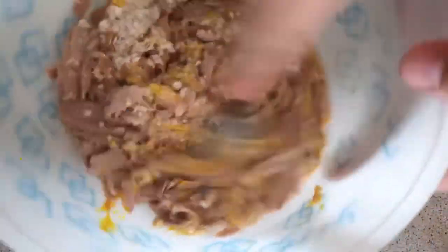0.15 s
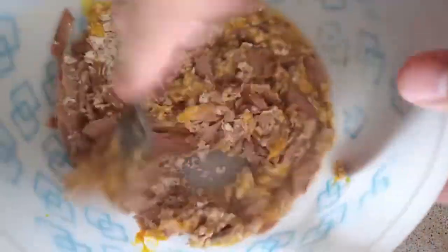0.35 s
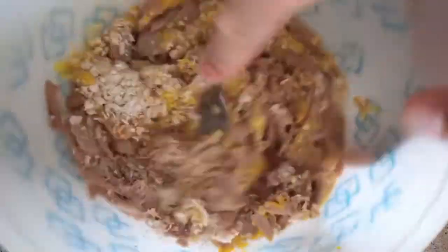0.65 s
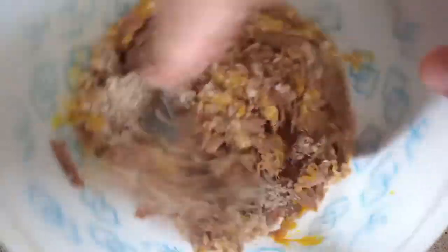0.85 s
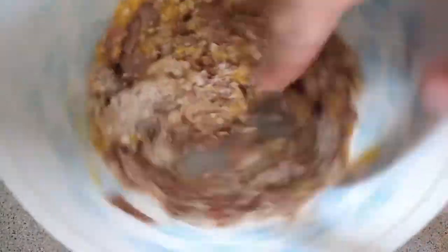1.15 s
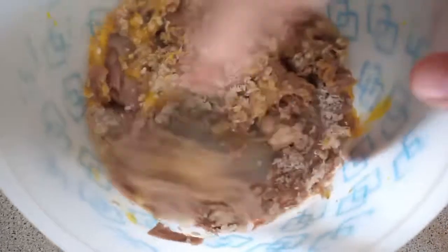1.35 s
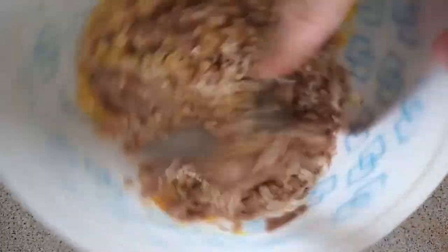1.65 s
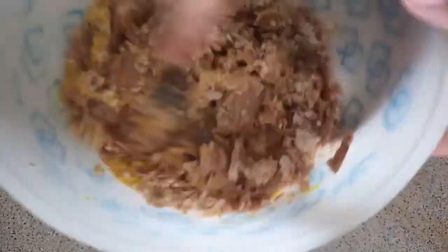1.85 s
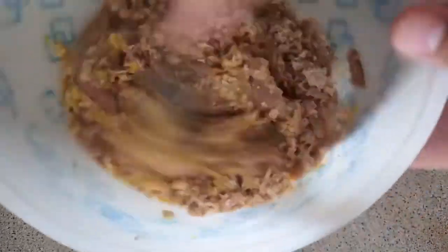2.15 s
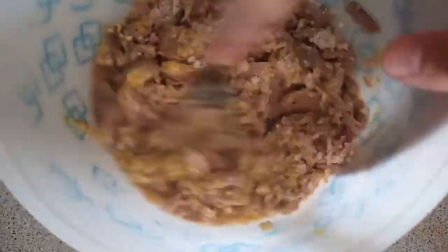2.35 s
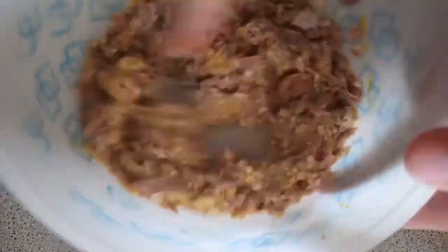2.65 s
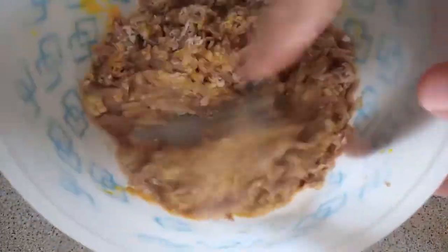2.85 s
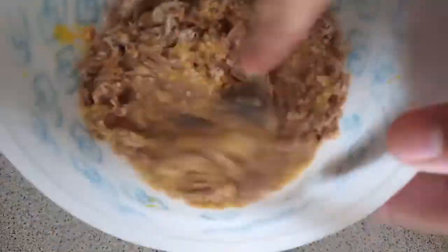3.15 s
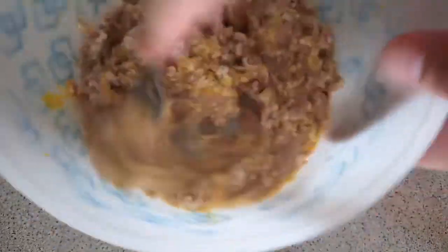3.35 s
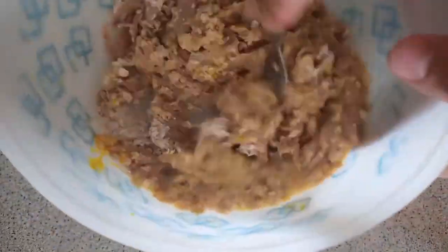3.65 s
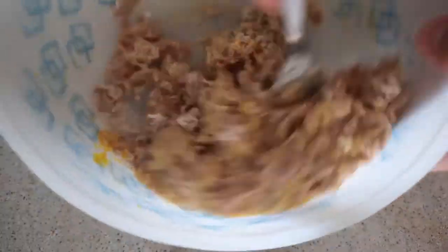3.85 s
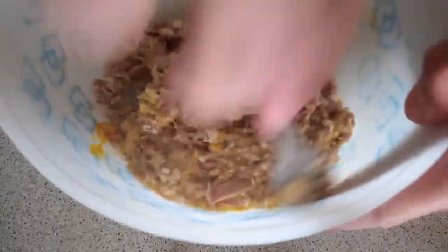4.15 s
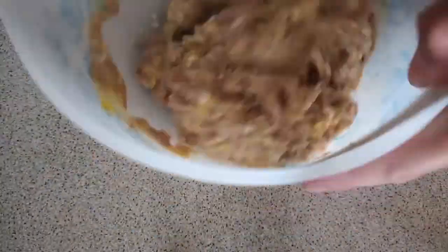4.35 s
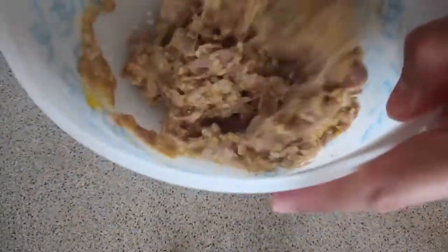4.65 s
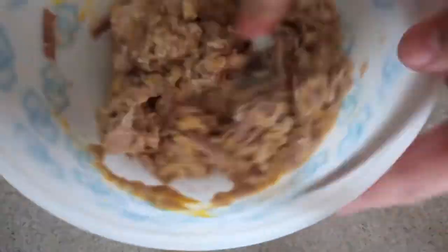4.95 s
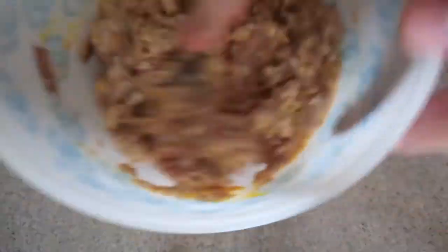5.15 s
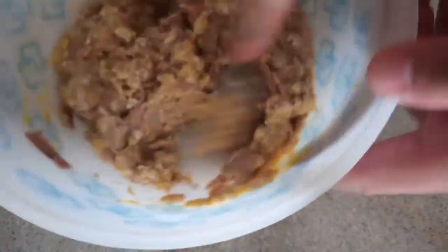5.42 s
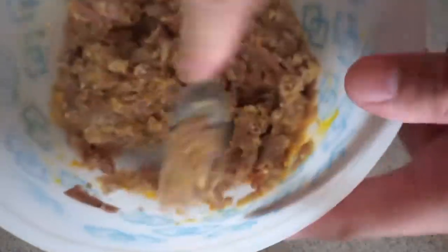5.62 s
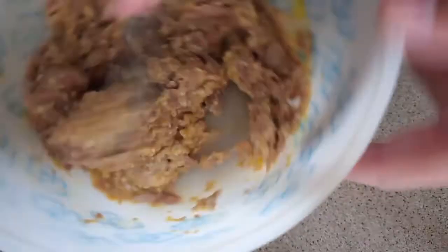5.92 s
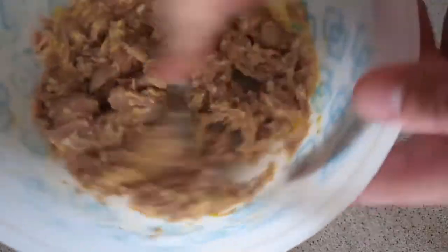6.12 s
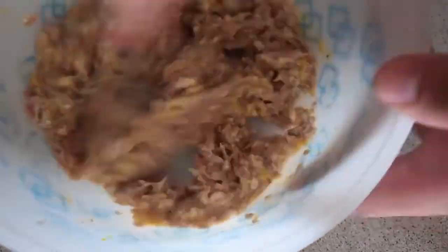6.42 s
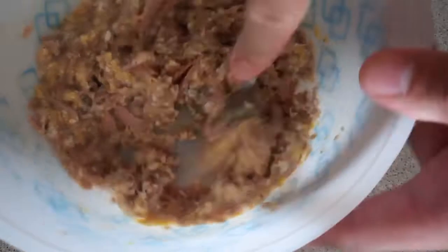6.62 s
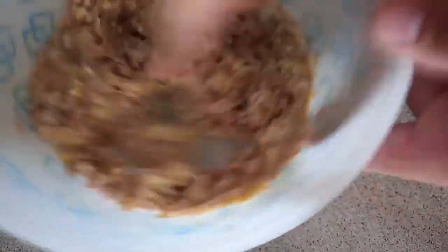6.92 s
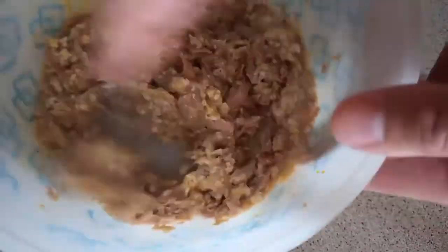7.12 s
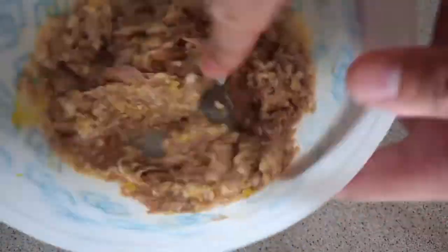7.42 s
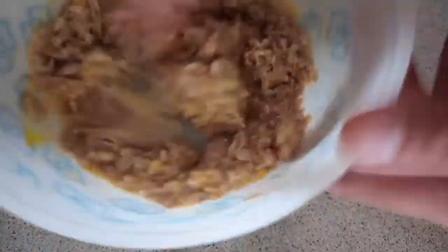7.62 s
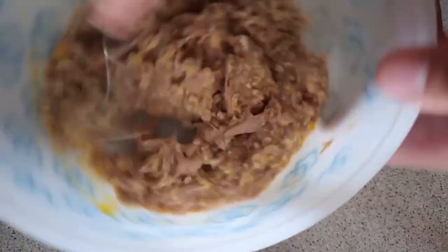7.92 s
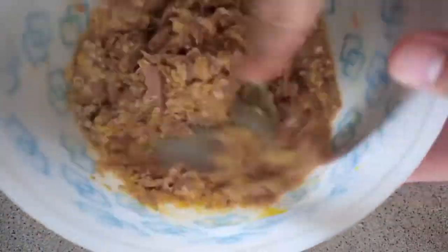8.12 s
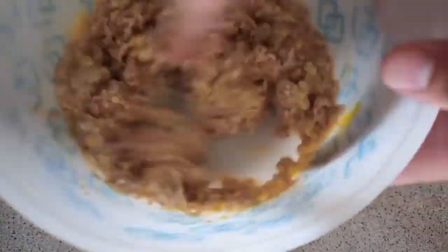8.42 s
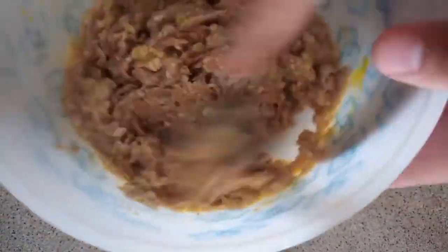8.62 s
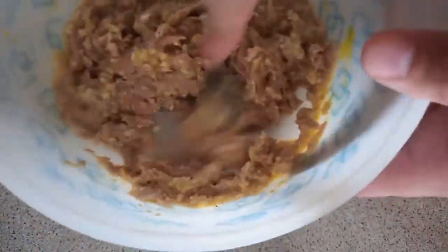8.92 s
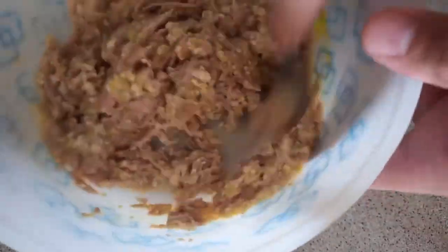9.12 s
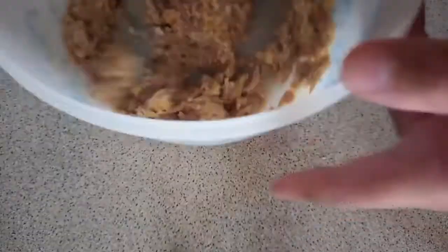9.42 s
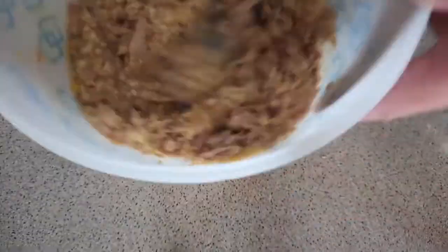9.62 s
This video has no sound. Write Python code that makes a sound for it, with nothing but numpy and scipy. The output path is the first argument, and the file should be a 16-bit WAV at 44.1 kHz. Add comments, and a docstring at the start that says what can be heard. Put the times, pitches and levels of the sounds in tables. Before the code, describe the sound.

Fast, wet fork strokes squish and crackle through thick mash, while tines clack and scrape against the bowl and low thumps punctuate the stirring.

```python
"""A metal fork mashes and stirs a wet mixture in a hand-held bowl, close by in a kitchen.
It beats to and fro in runs of about twelve strokes a second. Each stroke is shaped noise: it peels free
with a crackle, squishes, ticks wetly and, the harder it is, grazes the bowl. Now and then the tines skid
or clack as bursts of tiny slips, and the pushed bowl thumps as short decaying tones.
Air pockets ring with gliding tones, the mash rustles softly, and the walls add a faint echo."""
import sys
import numpy as np
from scipy import signal
from scipy.fft import rfft, irfft, next_fast_len
from scipy.io import wavfile
from scipy.ndimage import uniform_filter1d, map_coordinates

SR = 44100
rng = np.random.default_rng(int(sys.argv[2]) if len(sys.argv) > 2 else 0)


def wrap_up_sound(samples):
    """Save the sound to the file named by the first command line argument, as 16-bit audio."""
    columns = np.atleast_2d(samples).T
    # keep every value between -1 and 1, then stretch to whole-number steps
    tamed = np.clip(columns, -1, 1)
    steps = np.round(tamed * 32767).astype(np.int16)
    wavfile.write(sys.argv[1], SR, steps)


N = 430857
TOP_HZ = 8200  # nearly nothing sounds above this
SIZE = 16384  # samples in one short sound
AGE = np.arange(SIZE) / SR  # time since a short sound began [s]
HZ = np.fft.rfftfreq(SIZE, 1 / SR)

# All levels in the tables are relative: the layers scale them further.
# how long the echo of the walls takes to fade by 60 dB: (frequency [Hz], fade time [s])
ECHO_FADE = [(120, 0.26), (2000, 0.17), (8000, 0.31)]
# colour of the soft rustle of the mash: (frequency [Hz], level [dB])
RUSTLE_COLOUR = [(25, -8.5), (120, 8), (250, -18), (600, -16), (1300, -14.5), (6000, -22.5), (8000, -43.5)]
# resonances of the air inside the bowl: (frequency [Hz], width [Hz], level [dB])
BOWL_AIR = [(582, 96, -2), (1247, 55, 1.5)]
# air pockets open behind the fork: (centre [s], length [s], start pitch [Hz], end pitch [Hz], level [dB])
AIR_POCKETS = [(3.23, .17, 1490, 1107, -61.5), (3.962, .048, 1300, 890, -73.5),
               (4.097, 0.051, 700, 683, -71), (4.242, 0.062, 1560, 1226, -43.5),
               (4.465, 0.051, 1660, 1680, -69), (5.823, 0.0122, 2150, 2160, -42),
               (7.839, 0.009, 1950, 1890, -38), (8.648, 0.098, 1387, 1124, -64)]
# how freely the bowl rocks in the hand: (time [s], level [dB])
BOWL_ROCKING = [(0, -20), (.55, -3), (2.4, -3.5), (3.2, -6), (4.7, 5), (7.5, -2.5), (9.7, -0.5)]
# the bowl is shoved or knocked hard: (time [s], pitch [Hz], level [dB])
HARD_KNOCKS = [(.528, 120, -44), (.762, 357, -39), (.762, 193, -37), (1.11, 127, -39), (1.671, 129, -28.5),
               (2.203, 616, -31.5), (2.238, 127, -37.5), (2.408, 141, -40.5), (2.712, 112, -39.5),
               (3.596, 365, -35.5), (3.712, 360, -36.5), (3.714, 167, -37.5), (3.993, 470, -35),
               (4.884, 134, -34), (4.908, 191, -32), (5.34, 138, -26.5), (5.343, 592, -27),
               (5.386, 137, -28), (5.887, 135, -30.5), (6.425, 125, -40.5), (6.5, 124, -32.5),
               (6.778, 132, -34), (7.045, 135, -32), (7.687, 111, -42), (8.086, 134, -40),
               (8.966, 384, -31), (8.968, 163, -37.5), (9.101, 144, -35.5), (9.298, 128, -35.5),
               (9.365, 180, -29.5), (9.43, 161, -35), (9.604, 138, -18.5), (9.605, 577, -20)]
# the fork strikes the bowl: (time [s], time to fade by 60 dB [s], tine level [dB], bowl wall level [dB])
FORK_BLOWS = [(.761, 0.078, -37.5, -34.5), (1.593, 0.094, -44, -38), (2.181, 0.051, -41, -62),
              (2.236, .052, -52, -43), (2.582, 0.073, -32.5, -44.5), (2.867, .034, -31, -30.5),
              (2.879, 0.031, -49, -35.5), (3.029, 0.029, -40.5, -52), (3.108, 0.17, -47, -43.5),
              (3.597, 0.18, -50, -48), (3.992, 0.13, -54.5, -43), (4.523, 0.038, -72, -50.5),
              (4.881, 0.053, -44, -36.5), (4.907, 0.039, -45, -42.5), (5.304, 0.15, -48.5, -54.5),
              (5.341, 0.02, -35.5, -33.5), (5.816, 0.16, -59, -71), (6.417, 0.1, -56, -48),
              (6.499, 0.011, -38, -45), (7.835, .13, -46, -42.5), (8.73, 0.21, -51, -45),
              (8.832, 0.058, -36, -51), (8.965, 0.035, -61, -40.5), (9.365, 0.25, -50.5, -43.5),
              (9.601, 0.013, -34, -29)]
# hard skids of the tines over the bowl: (centre [s], length [s], tine level [dB], bowl wall level [dB])
HARD_SKIDS = [(0.522, 0.011, -58, -47), (1.313, 0.02, -48, -56), (1.362, 0.0079, -44, -52),
              (1.391, 0.016, -41, -51), (1.638, 0.013, -43.5, -60), (1.791, 0.019, -42, -52),
              (1.874, 0.019, -47.5, -59), (2.03, 0.026, -45, -51), (2.109, 0.019, -37.5, -57),
              (2.196, 0.021, -41.5, -47.5), (2.435, 0.032, -43, -49), (2.911, .021, -46, -47.5),
              (3.002, 0.018, -49, -51.5), (3.072, 0.017, -45, -51), (3.391, 0.02, -44.5, -54),
              (3.552, 0.019, -45, -54), (3.723, 0.014, -40.5, -45), (3.77, 0.073, -49, -42),
              (4.183, 0.029, -69, -46), (4.25, .075, -54, -44), (4.296, 0.038, -44, -41),
              (4.59, .013, -52.5, -51.5), (5.064, .017, -50, -47), (6.053, 0.021, -52.5, -49),
              (6.214, 0.024, -52, -49), (6.528, 0.0097, -46, -53), (6.849, 0.023, -45.5, -53),
              (8.763, 0.016, -45, -52), (8.992, 0.025, -43.5, -43), (9.107, .03, -44.5, -46.5),
              (9.216, .027, -45.5, -50), (9.715, 0.021, -50, -58.5)]
# colour of the fork's tines: (frequency [Hz], level [dB])
TINE_COLOUR = [(150, -17.5), (350, -16), (1000, -18.5), (1800, -13.5), (2050, -0.5), (2400, 3.5),
               (2650, -3), (2900, -1.5), (3400, -9.5), (4000, -11.5), (5500, -19.5), (7000, -21.5),
               (8000, -42.5)]
# colour of the bowl wall: (frequency [Hz], level [dB])
WALL_COLOUR = [(100, -7), (250, -3.5), (380, -1), (470, -7), (590, 1.5), (780, -8.5), (1050, -7.5),
               (1220, -2), (1550, -6), (2200, 2), (3300, -26), (6500, -18.5), (8000, -46)]
# colour of the squishing mash: (frequency [Hz], level [dB])
MASH_COLOUR = [(150, -12), (350, -3.5), (430, -6.5), (590, 0), (780, -11.5), (1220, -1), (1700, -9),
               (2450, -0.5), (3600, -9), (6000, -14), (7000, -21.5), (8000, -50.5)]
# colour of the fork peeling off the mash: (frequency [Hz], level [dB])
PEEL_COLOUR = [(300, -30), (1500, -6), (3500, -1), (6300, 0), (7300, -9.5), (8000, -21)]
# runs of even back-and-forth strokes: (first stroke [s], last stroke [s], number of strokes [count])
STROKE_RUNS = [(0.072, 0.719, 9), (0.894, 1.546, 9), (1.712, 3.549, 24), (4.488, 4.686, 3),
               (4.834, 4.895, 2), (4.962, 5.155, 3), (5.23, 5.559, 5), (5.732, 7.793, 27),
               (7.952, 8.272, 4), (8.362, 9.007, 9), (9.091, 9.22, 2), (9.367, 9.711, 5)]
# how hard the hand bears on the fork: (time [s], effort [dB])
HAND_EFFORT = [(0.07, -58), (0.64, -61.5), (0.9, -57), (1.54, -60.5), (1.95, -57), (2.03, -57.5),
               (2.35, -58), (2.67, -52), (2.83, -60.5), (2.99, -51.5), (3.23, -57.5), (4.84, -60.5),
               (5.07, -54.5), (5.55, -63.5), (5.81, -53.5), (6.28, -57.5), (7.08, -55.5), (7.16, -61),
               (8.92, -54), (9.32, -52), (9.44, -51), (9.55, -59.5)]

# a stroke: typical length, spread of lengths (share), scatter of strengths
STROKE_S, STROKE_SPREAD, STROKE_SCATTER_DB = .045, .08, 2
# a stroke about this near to a hard skid or blow meets bare bowl and less mash, so its effort drops
BARE_S, BARE_DB = 0.026, -6.5
MASH_DB = -3.5  # the squish of a stroke, relative to its effort
# effort at which the tines fully reach the bowl; extra dB of scraping lost for each dB below it
REACH_DB, BITE = -50.5, 0.94
GRAZE_S, GRAZE_TINE_DB, GRAZE_WALL_DB = .02, 1.5, -2.5  # light scrape: length, levels relative to its effort
JOLT_HZ, JOLT_DB, JOLT_LEAD_S = 125, -52.5, .004  # jolt of every second stroke: pitch, level, lead
PLOP_HZ, PLOP_DB, PLOPS = 363, -57, 24  # soft knocks through the mash: pitch, level, how many
# the fork tears free ahead of each stroke: lead, scatter, time to fade by 60 dB, level relative to the effort
PEEL_LEAD_S, PEEL_SCATTER_S, PEEL_T60_S, PEEL_DB = .03, 0.006, 0.061, 1.5


def amp(db):
    """Decibels to gain."""
    return 10 ** (np.asarray(db) / 20)


def unit(x):
    """Scale to an average strength (rms) of 1."""
    return x / np.sqrt(np.mean(x ** 2) + 1e-20)


def along(points, hz):
    """Read a (frequency, value) table between its points, on a log frequency axis."""
    f, v = np.transpose(points)
    return np.interp(np.log(hz + 1), np.log(f + 1), v)


def wobble(position):
    """A smooth random curve with one new random value per unit of position."""
    knots = rng.standard_normal(int(position.max()) + 4)
    return map_coordinates(knots, [position], mode="nearest")


def add(track, s, sound):
    """Mix a sound into the track from time s on, cut to fit."""
    start = round(s * SR)
    part = sound[max(-start, 0):max(N - start, 0)]
    track[max(start, 0):][:len(part)] += part


def body(push, colour):
    """A resonant body answers a push; its peaks shift with the point of contact. Keeps the push's energy."""
    ripple_db = 3.5 * np.tanh(wobble(np.sqrt(HZ) / 2))
    gain = amp(along(colour, HZ) + ripple_db) * HZ / (HZ + 60)
    # folding the cepstrum makes the body answer after the push, not before it
    cepstrum = irfft(np.log(np.maximum(gain, 1e-6)))
    cepstrum[1:SIZE // 2] *= 2
    cepstrum[SIZE // 2 + 1:] = 0
    response = np.exp(rfft(cepstrum))
    return unit(irfft(rfft(push) * response)) * np.std(push)


def grains(envelope, rate, hiss):
    """Tiny random slips or snaps (rate per second) over a smooth hiss, with the energy of the envelope."""
    slips = (rng.random(SIZE) < rate / SR) * rng.standard_normal(SIZE)
    texture = unit(slips) + hiss * rng.standard_normal(SIZE)
    return unit(envelope * texture) * np.sqrt(np.mean(envelope ** 2))


def swell(length, order=2):
    """Pressure of one stroke, which peaks 2 lengths after its start; a higher order is squarer."""
    return np.exp(-np.abs(2 * (AGE - 2 * length) / length) ** order)


def shifting(x):
    """Small cavities in the mash open and close, so its resonances keep moving."""
    z = signal.stft(x, nperseg=512)[2]
    across_pitch = uniform_filter1d(rng.standard_normal(z.shape), size=7, axis=0)
    field = uniform_filter1d(across_pitch, size=4, axis=1)
    moved = signal.istft(z * amp(4 * unit(field)), nperseg=512)[1][:N]
    return unit(moved) * np.std(x)


def kitchen(x):
    """A short blurred echo from the walls: noise that fades at its own speed for each pitch."""
    hz, t, z = signal.stft(rng.standard_normal(SIZE), SR, nperseg=256)
    fade = amp(-60 * t / along(ECHO_FADE, hz)[:, None])
    tail = signal.istft(z * fade, SR, nperseg=256)[1]
    return signal.fftconvolve(x, tail / np.linalg.norm(tail))[:N]


def hollow(x):
    """The bowl's air adds two steady resonances to the soft sounds inside it."""
    out = x
    for hz, width, db in BOWL_AIR:
        b, a = signal.iirpeak(hz, hz / width, fs=SR)
        out = out + amp(db) * signal.lfilter(b, a, x)
    return out


def settling(mash):
    """Stirred mash keeps creeping and rustling around the strokes, and falls almost silent at rest."""
    hz = np.fft.rfftfreq(N, 1 / SR)
    noise = unit(irfft(rfft(rng.standard_normal(N)) * amp(along(RUSTLE_COLOUR, hz)), N))
    stirred = np.sqrt(np.abs(uniform_filter1d(mash ** 2, size=SR // 6)))
    level = amp(-73) + amp(-14) * stirred
    unrest = amp(7.05 * wobble(np.arange(N) / SR * 18))
    return shifting(noise) * level * unrest


def pockets():
    """A hollow in the mash rings narrowly and glides as its size changes."""
    out = np.zeros(N)
    for s, length, start_hz, end_hz, db in AIR_POCKETS:
        pitch = np.interp(AGE - 2 * length, [-length / 2, length / 2], [start_hz, end_hz])
        knots = AGE * 430
        flutter = wobble(knots) + 1j * wobble(knots)
        tone = (flutter * np.exp(2j * np.pi * np.cumsum(pitch) / SR)).real
        add(out, s - 2 * length, amp(db) * swell(length) * unit(tone))
    return out


def rocking_db(s):
    """How much the bowl gives in the hand at time s."""
    return np.interp(s, *np.transpose(BOWL_ROCKING))


def handling(beat, nudge_db=-70):
    """Every stroke also nudges the bowl softly in the hand: a swell of low noise."""
    out = np.zeros(N)
    nudge = [(25, -5), (70, -12.5), (125, 0.0), (200, -10), (900, -52.5)]  # (frequency [Hz], level [dB])
    for s, length, _ in beat:
        level_db = nudge_db + rocking_db(s) + 2 * rng.standard_normal()
        push = swell(length) * rng.standard_normal(SIZE)
        add(out, s - 2 * length, amp(level_db) * body(push, nudge))
    return out


def jolts(beat, pitch_spread=0.15, scatter_db=2.0):
    """Each push stroke rocks the bowl, and now and then a stroke plops: rows like HARD_KNOCKS."""
    pushes = [(s - JOLT_LEAD_S, JOLT_HZ, JOLT_DB + rocking_db(s)) for s, _, _ in beat[1::2]]
    chosen = beat[np.argsort(rng.random(len(beat)))[:PLOPS]]
    plops = [(s, PLOP_HZ, PLOP_DB) for s, _, _ in chosen]
    return [(s, hz * np.exp(pitch_spread * rng.standard_normal()), db + scatter_db * rng.standard_normal())
            for s, hz, db in pushes + plops]


def thumps(knocks, cycles=11, rise=0.25, upper_db=-12, upper_ratio=1.4, slap_db=-17):
    """The loaded bowl rings for a few cycles: low when shoved, higher when the fork knocks through."""
    out = np.zeros(N)
    slap_band = signal.butter(2, [150, 600], "band", fs=SR, output="sos")
    for s, hz, db in knocks:
        turns = hz * AGE
        ring = np.sin(2 * np.pi * turns) + amp(upper_db) * np.sin(2 * np.pi * turns * upper_ratio)
        # the mash slaps dully against the wall with each jolt
        slap = unit(signal.sosfilt(slap_band, rng.standard_normal(SIZE)))
        shape = amp(db - 60 * turns / cycles) * (1 - np.exp(-turns / rise))
        add(out, s, shape * (ring + amp(slap_db) * slap))
    return out


def clacks():
    """A blow is a brief rattle of the tines, damped at once by the mash."""
    out = np.zeros(N)
    for s, t60, tine_db, wall_db in FORK_BLOWS:
        first_touch = 0.72 * np.exp(-AGE / 0.0065)
        rattle = grains(0.68 * amp(-60 * AGE / t60) + first_touch, rate=2800, hiss=1.0)
        add(out, s, amp(tine_db) * body(rattle, TINE_COLOUR) + amp(wall_db) * body(rattle, WALL_COLOUR))
    return amp(-3.0) * out


def grazes(beat):
    """The harder a stroke, the more its tines graze the bowl: rows like HARD_SKIDS."""
    touches = [(s, db + BITE * min(db - REACH_DB, 0)) for s, _, db in beat]
    return [(s, GRAZE_S, db + GRAZE_TINE_DB, db + GRAZE_WALL_DB) for s, db in touches]


def scrapes(skids):
    """The tines stick and slip; the same slips sound the fork and the bowl wall."""
    out = np.zeros(N)
    for s, length, tine_db, wall_db in skids:
        chatter = amp(4.4 * wobble(AGE * 350))
        slips = grains(swell(length, order=2.5) * chatter, rate=3500, hiss=0.7)
        tines = amp(tine_db) * body(slips, TINE_COLOUR)
        wall = amp(wall_db) * body(slips, WALL_COLOUR)
        add(out, s - 2 * length, tines + wall)
    return amp(-1.8) * out


def wet_ticks(beat, count=2, tick_db=-5, reach=.7):
    """Around each stroke a few wet films snap: tiny soft ticks, each at its own pitch."""
    out = np.zeros(N)
    t = AGE[:SR // 60]
    for s, length, db in beat:
        for when, width, strength in np.tanh(rng.standard_normal((count, 3))):
            hz = 5300 * np.exp(.18 * width)
            life = t / .0007  # each tick peaks about 0.7 ms after it starts
            tick = wobble(t * hz / 2) * np.sin(2 * np.pi * hz * t) * life * np.exp(1 - life)
            add(out, s + reach * length * when, amp(db + tick_db + 1.7 * strength) * tick)
    return out


def peels(beat, scatter_db=3, attack_s=0.0025, crackle_db=5, snaps_per_s=260):
    """As the fork turns round it peels off the wet mash with a sudden, bright crackle."""
    envelope = np.zeros(N)
    shape = (1 - np.exp(-AGE / attack_s)) * amp(-60 * AGE / PEEL_T60_S)
    chance = np.tanh(rng.standard_normal((len(beat), 2)))
    for (s, _, db), (late, harder) in zip(beat, chance):
        start = s - PEEL_LEAD_S + PEEL_SCATTER_S * late
        add(envelope, start, amp(db + PEEL_DB + scatter_db * harder) * shape)
    size = next_fast_len(N)
    colour = amp(along(PEEL_COLOUR, np.fft.rfftfreq(size, 1 / SR)))
    fizz = unit(irfft(rfft(rng.standard_normal(size)) * colour, size)[:N])
    crackle = unit(amp(crackle_db * np.tanh(wobble(np.arange(N) / SR * snaps_per_s))))
    return envelope * crackle * shifting(fizz)


def squishes(beat):
    """Wet fibres shear under the fork in lumps."""
    out = np.zeros(N)
    for s, length, db in beat:
        lumps = amp(4.5 * np.tanh(wobble(AGE * 130)))
        snaps = grains(swell(length, order=3) * lumps, rate=700, hiss=.9)
        add(out, s - 2 * length, amp(db) * body(snaps, MASH_COLOUR))
    return amp(MASH_DB) * shifting(out)


def strokes():
    """Every stroke of the fork through the mash: rows of (centre [s], length [s], effort [dB])."""
    runs = [np.linspace(first, last, int(round(number))) for first, last, number in STROKE_RUNS]
    s = np.concatenate(runs)
    longer, harder = rng.standard_normal((len(s), 2)).T
    contacts = np.array([row[0] for row in HARD_SKIDS + FORK_BLOWS])
    nearest_s = np.abs(s[:, None] - contacts).min(axis=1)
    bare = np.exp(-(nearest_s / BARE_S) ** 2)
    effort_db = np.interp(s, *np.transpose(HAND_EFFORT)) + STROKE_SCATTER_DB * harder + BARE_DB * bare
    return np.column_stack([s, STROKE_S * np.exp(STROKE_SPREAD * longer), effort_db])


def scene():
    """Fork, mash and bowl, close up in the room."""
    beat = strokes()
    mash = squishes(beat)
    fork = scrapes(HARD_SKIDS + grazes(beat)) + clacks()
    bowl = thumps(HARD_KNOCKS + jolts(beat)) + handling(beat)
    soft = hollow(mash + settling(mash)) + peels(beat) + wet_ticks(beat) + pockets()
    near = fork + bowl + soft
    return (near + amp(-20.5) * kitchen(near))[None]


def record(dry, low_hz=45):
    """Thin the deep bass gently and cut steeply above the top frequency."""
    hz = np.fft.rfftfreq(N, 1 / SR)
    thinned = rfft(dry) * 1j * hz / (low_hz + 1j * hz)
    return irfft(thinned / (1 + (hz / TOP_HZ) ** 80), N)


dry = scene()
out = record(dry)
wrap_up_sound(out)
```